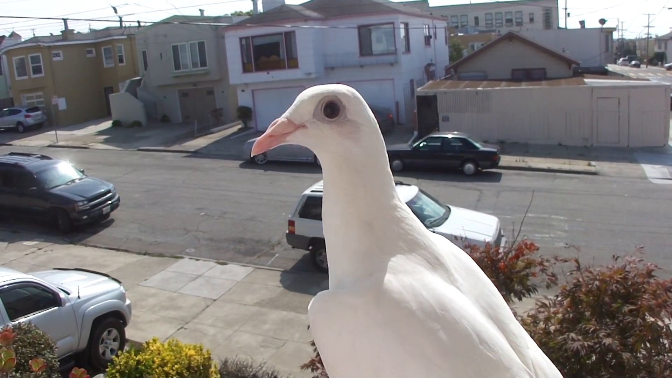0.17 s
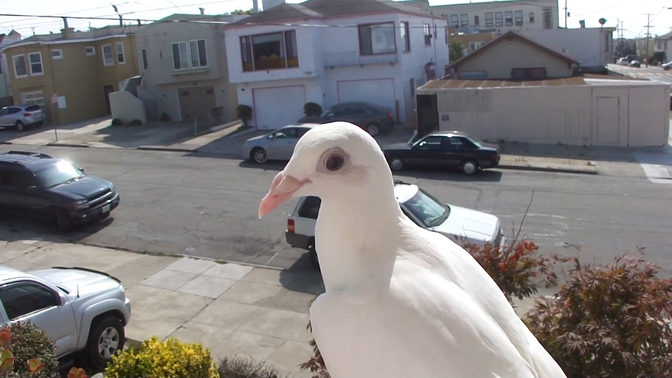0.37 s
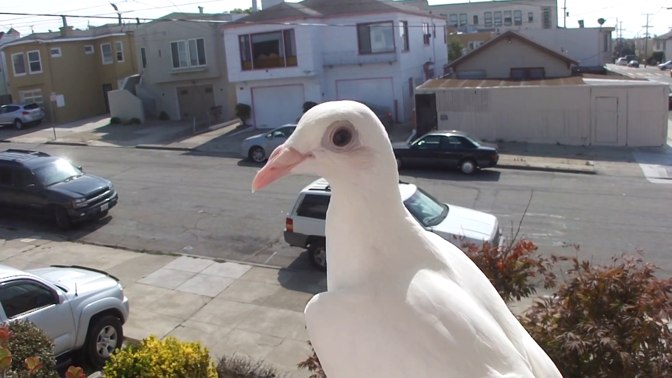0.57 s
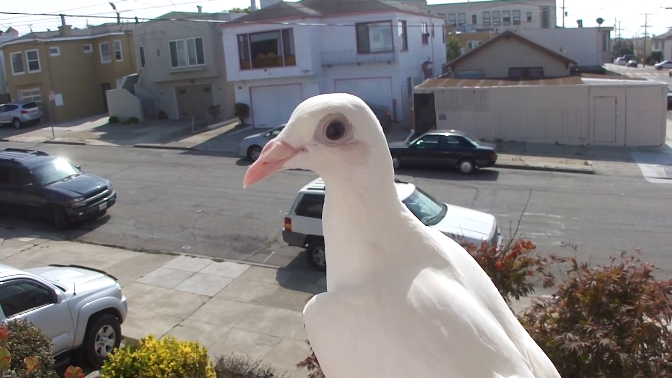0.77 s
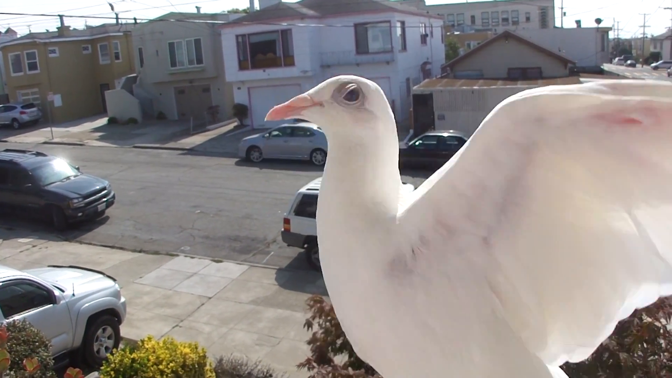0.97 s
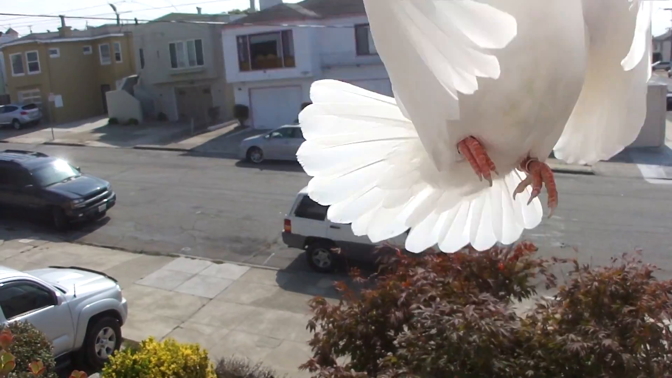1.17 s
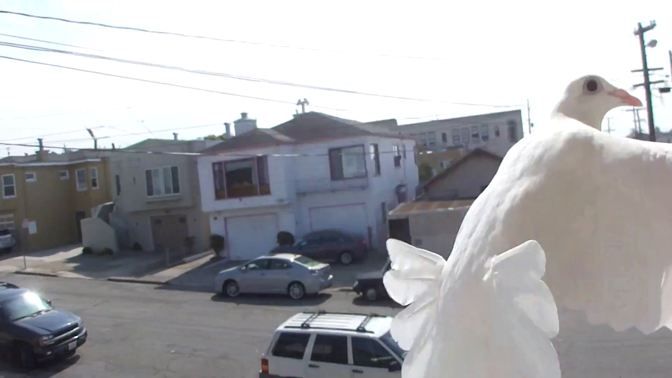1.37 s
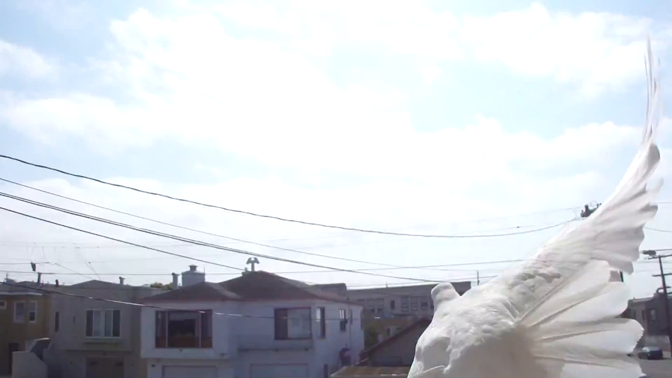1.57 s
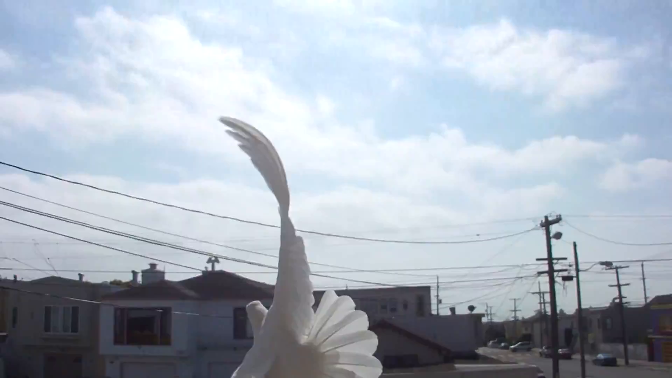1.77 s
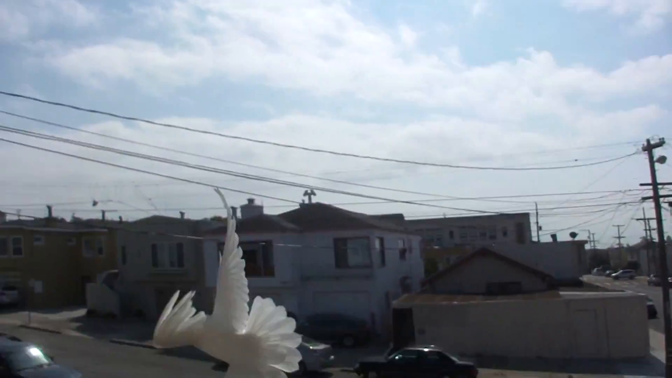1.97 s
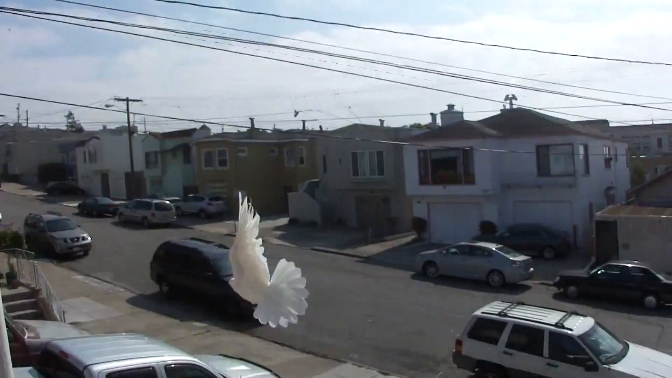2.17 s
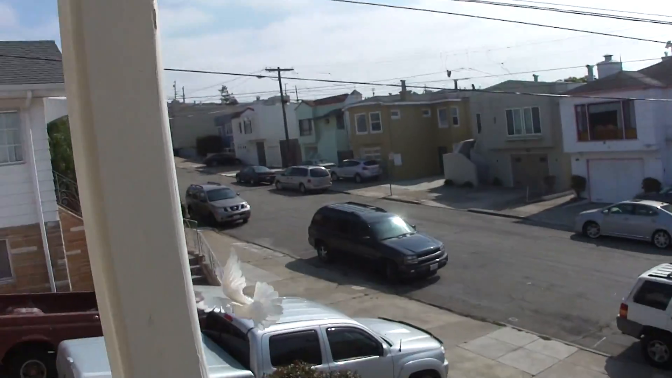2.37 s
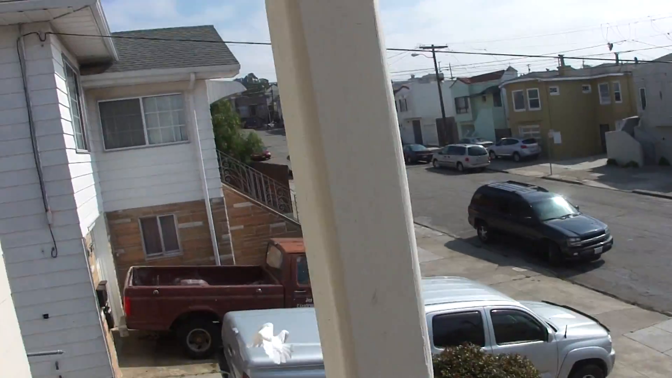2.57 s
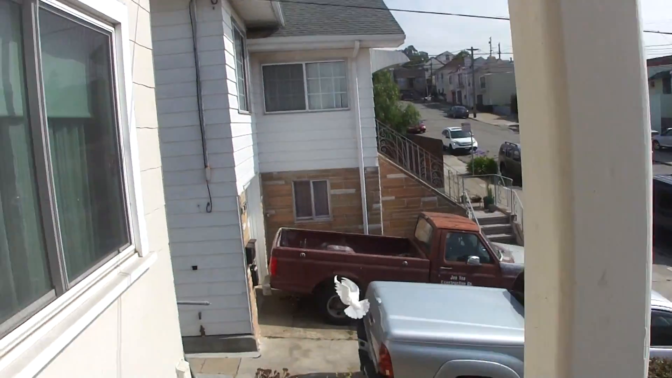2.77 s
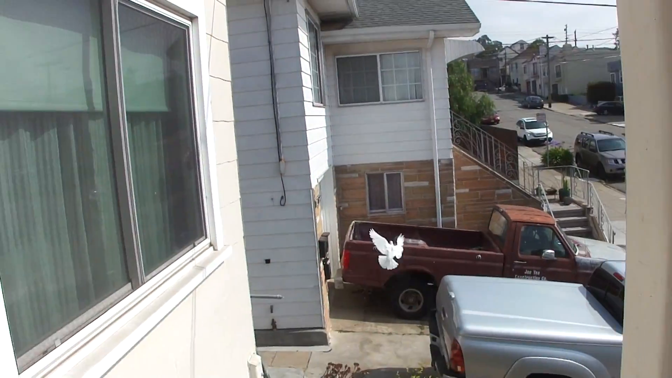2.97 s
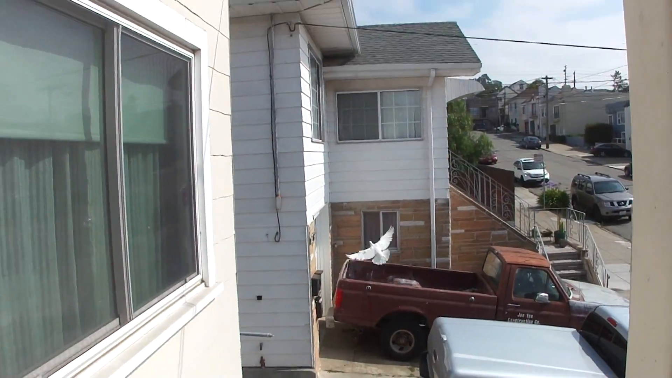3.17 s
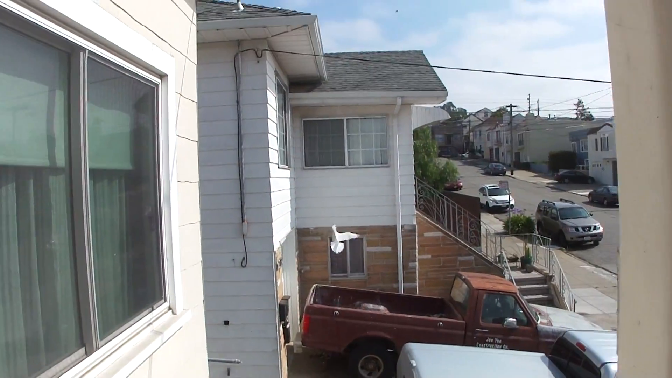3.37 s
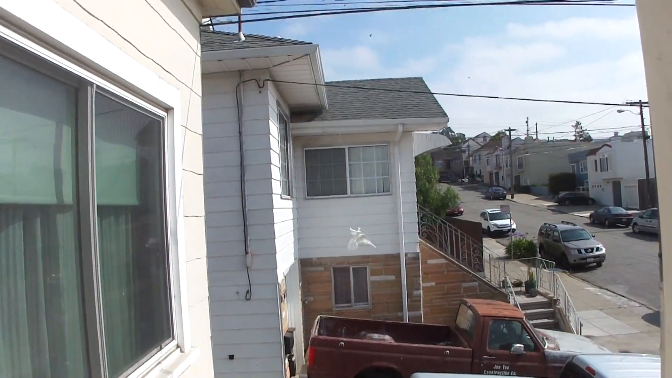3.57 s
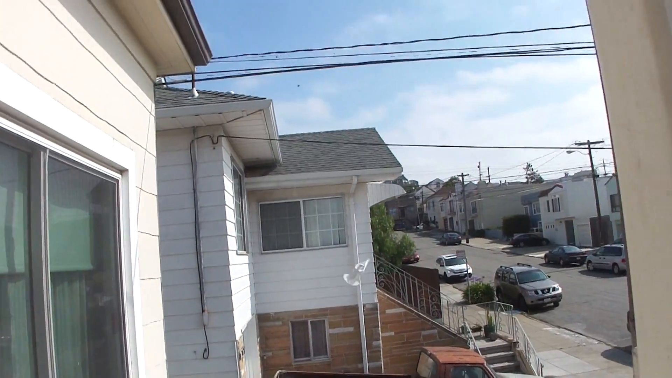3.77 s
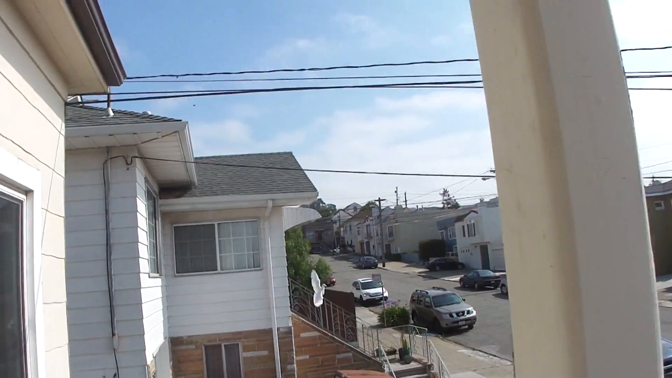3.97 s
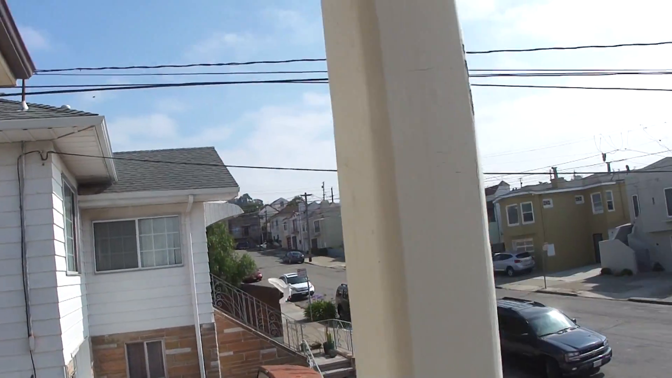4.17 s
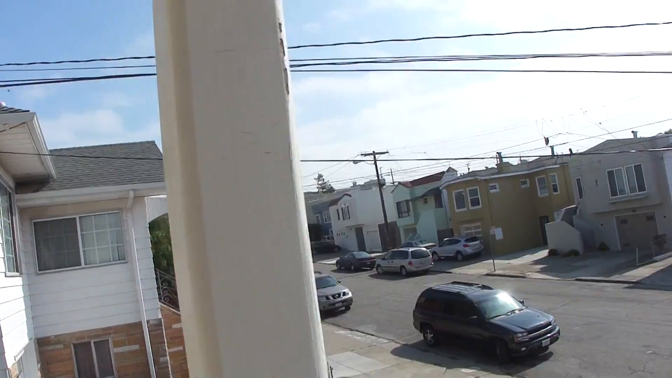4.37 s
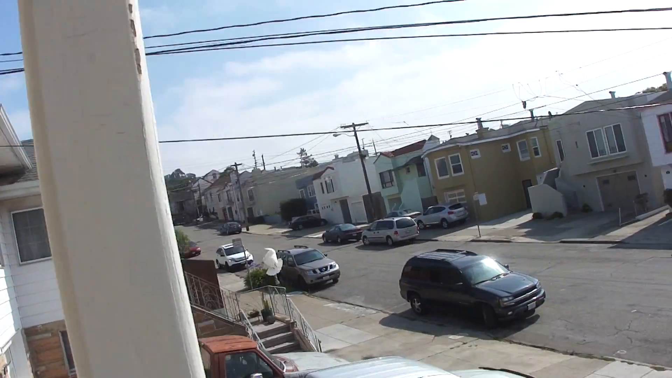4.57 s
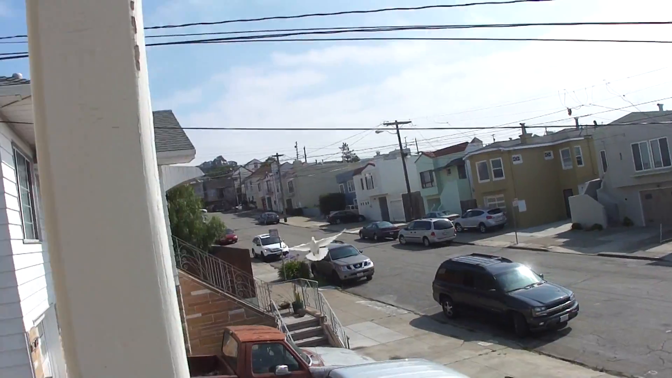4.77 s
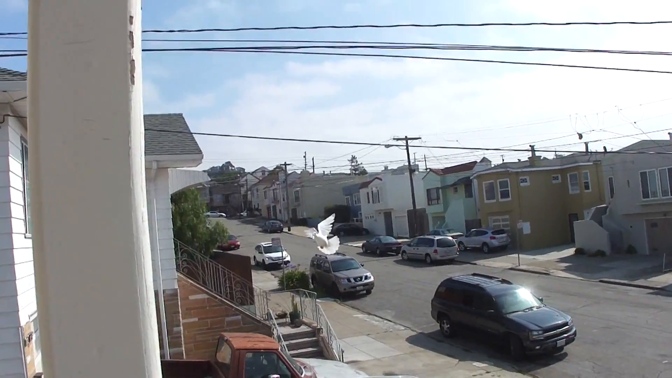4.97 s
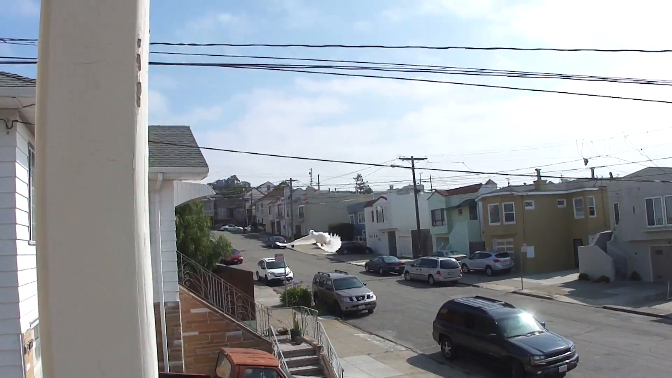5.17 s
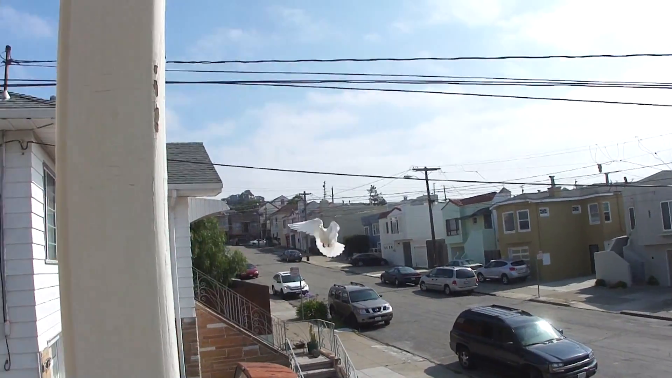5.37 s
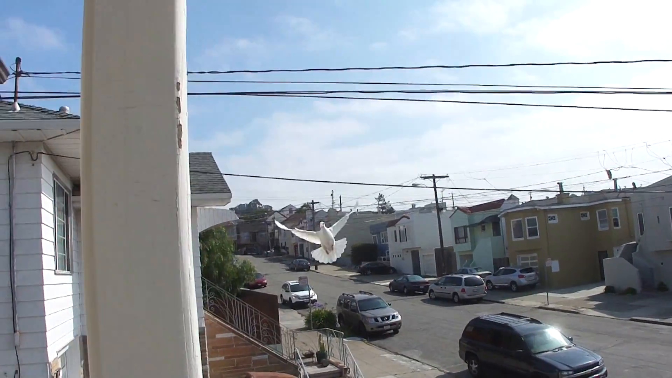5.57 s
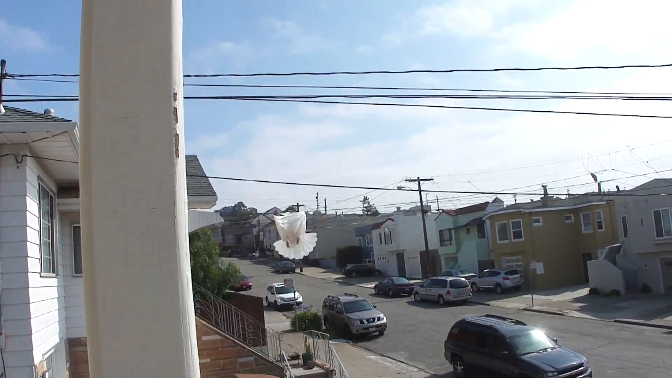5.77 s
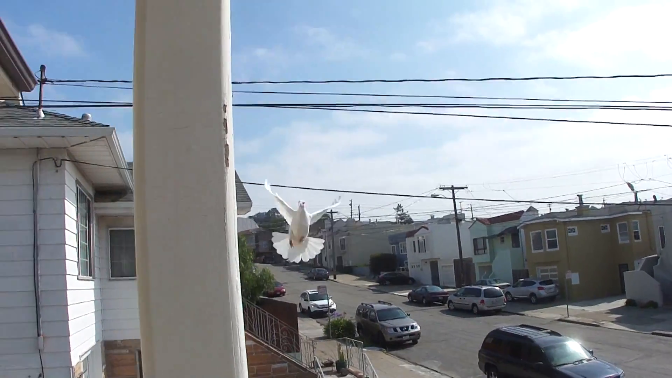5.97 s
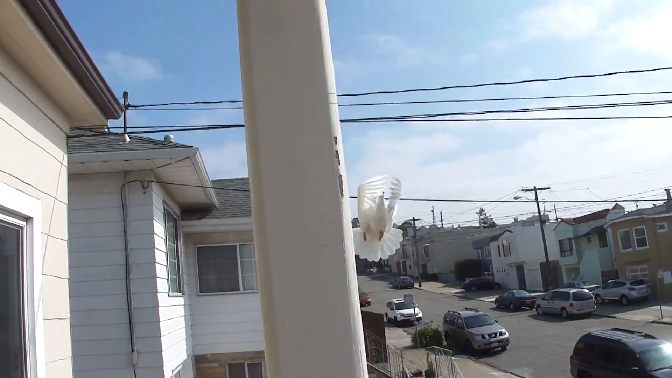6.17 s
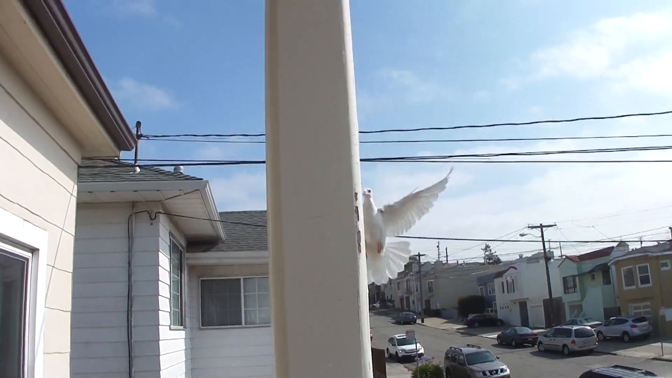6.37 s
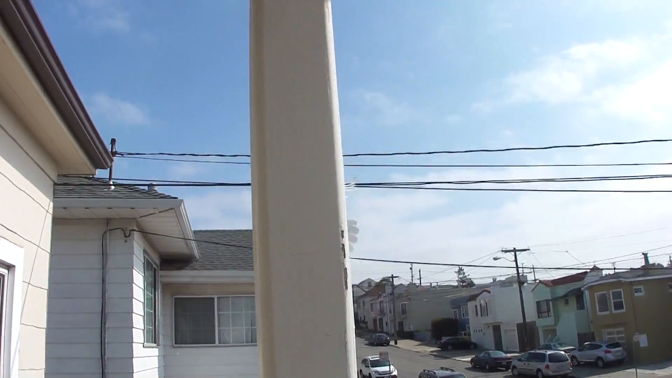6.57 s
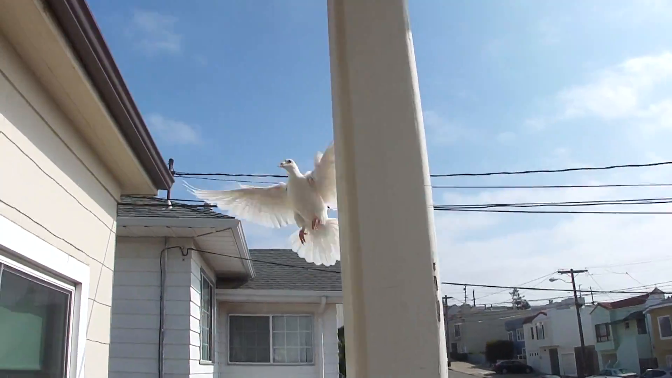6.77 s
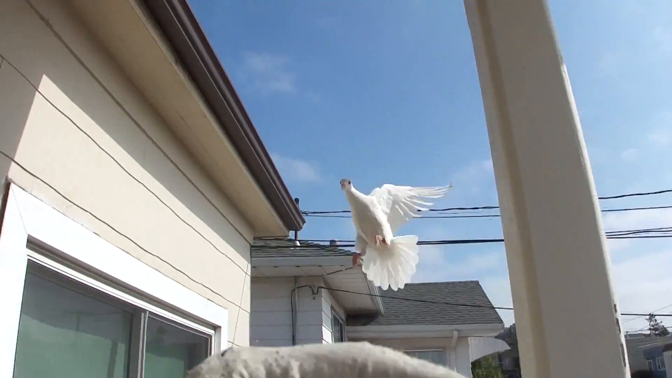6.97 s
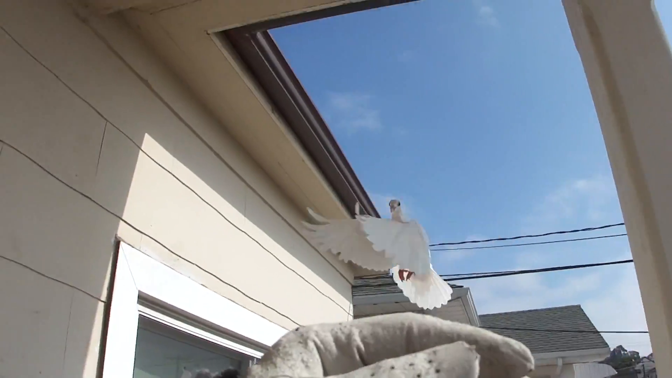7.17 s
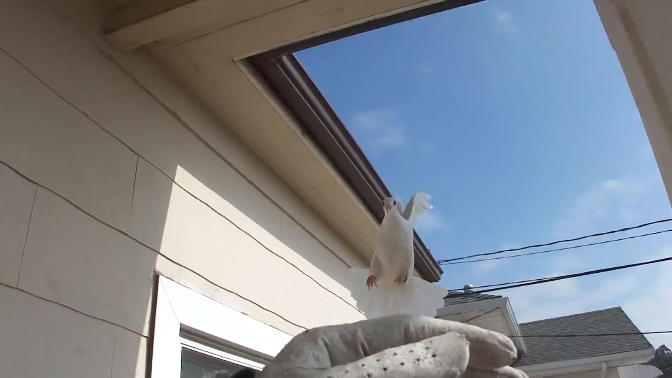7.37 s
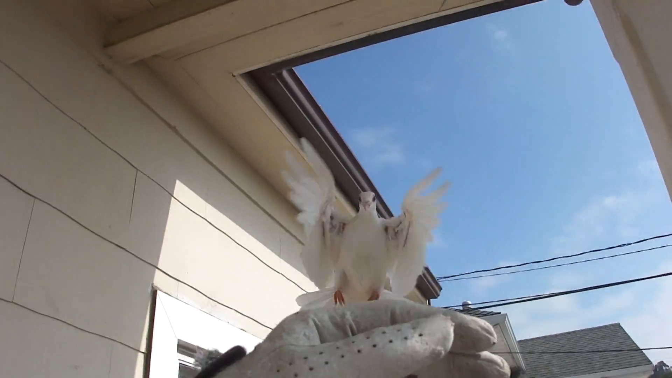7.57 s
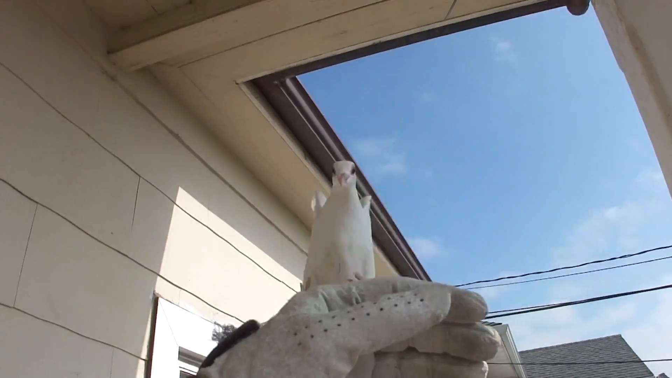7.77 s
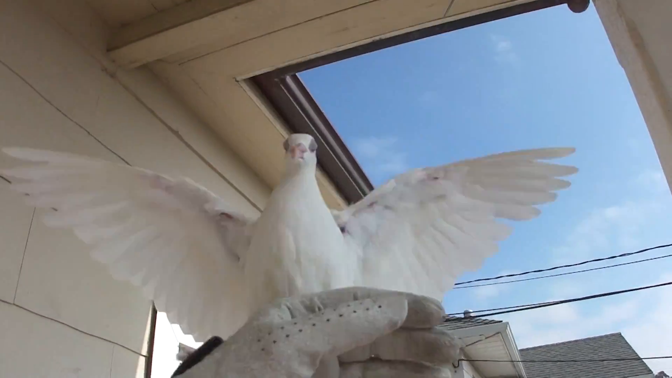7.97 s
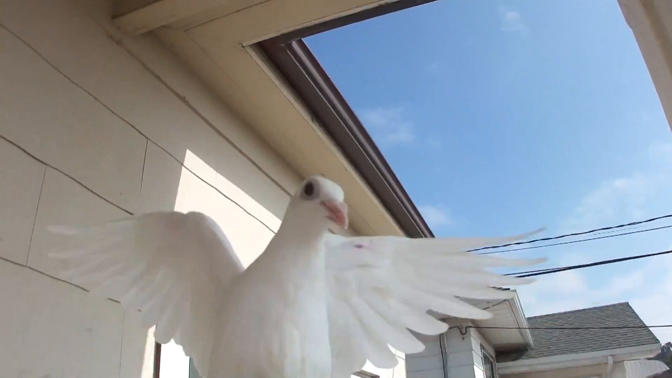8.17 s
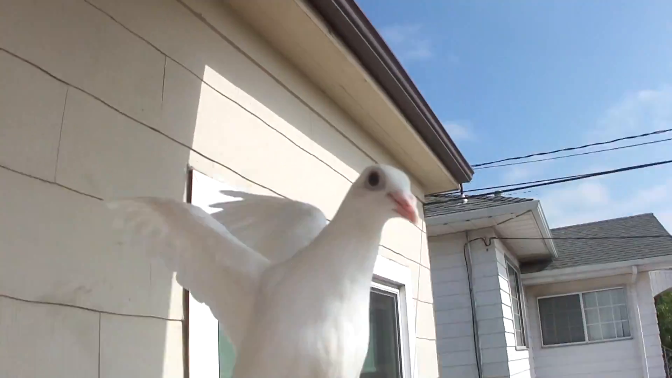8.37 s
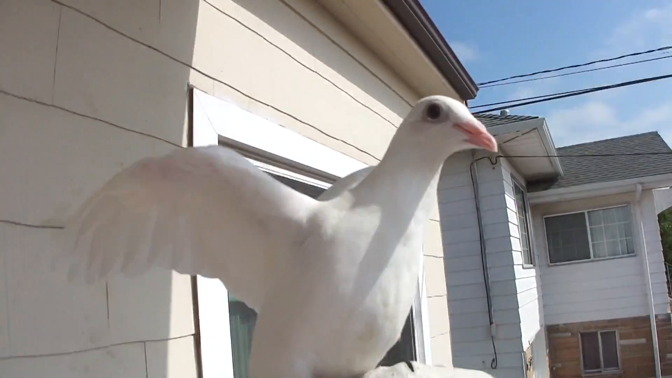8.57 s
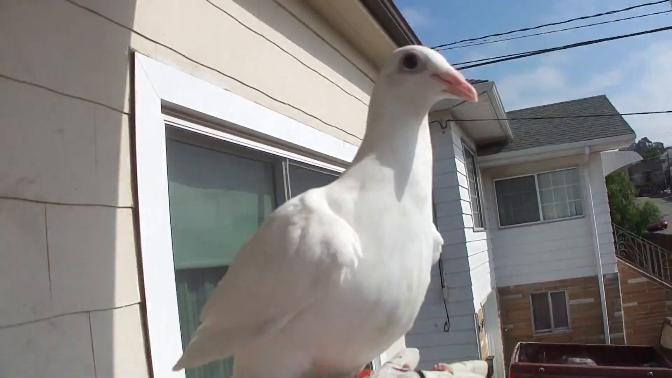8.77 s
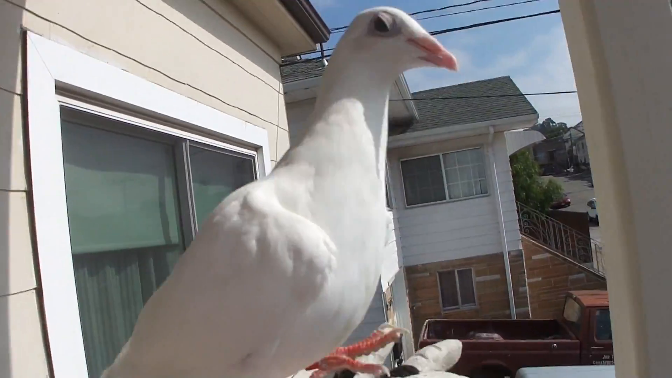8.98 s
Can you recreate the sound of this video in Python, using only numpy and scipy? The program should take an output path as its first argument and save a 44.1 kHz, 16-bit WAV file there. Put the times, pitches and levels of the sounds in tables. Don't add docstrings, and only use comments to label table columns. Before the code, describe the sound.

A faint street hum with a brief thin far squeal opens the scene. A bird's wings suddenly slap hard beside the microphone, pushing thumps of air into it, spread wide in stereo. Flapping shrinks to soft puffs in the distance while a far car swells slightly. Fast, breathy wingbeats then approach, louder and drier, ending in soft folding rustles by the house wall.

```python
import sys
import numpy as np
from scipy import signal
from scipy.fft import rfft, irfft, next_fast_len
from scipy.io import wavfile

SR = 44100
rng = np.random.default_rng(int(sys.argv[2]) if len(sys.argv) > 2 else 0)


def attenuation_scalar(level_db):
    decades = np.asarray(level_db, float) / 20
    return 10 ** decades


def store_wav(level_fs):
    pcm = np.round(np.clip(np.atleast_2d(level_fs), -1, 1) * 32767)
    wavfile.write(sys.argv[1], SR, pcm.T.astype(np.int16))


N = 398663

BIRD_PAN_DB = -1.5
# f/Hz, density/dB
RUSTLE = [(1500, -44), (3000, -1), (6000, 2.5), (10000, 5.5), (16000, -3.5)]
# f/Hz, likeness/-1..1
WING_ALIKE = [(100, 1), (1000, 0.965), (3000, 0.94), (8000, 0.66), (15000, 0.067)]


def in_time(rows):
    s, *columns = np.transpose(rows)
    return [np.interp(np.arange(N) / SR, s, c) for c in columns]


def at_hz(points, hz):
    point_hz, value = np.transpose(points)
    return np.interp(np.log(hz + 1), np.log(point_hz), value)


def drift(rate_hz):
    r = np.exp(-80 * np.pi * rate_hz / SR)
    slow = signal.lfilter([1], [1, -2 * r, r * r], rng.standard_normal(N // 40 + 2002))[2000:]
    slow = slow / np.sqrt(np.mean(slow ** 2) + 1e-20)
    return np.interp(np.arange(N) / 40, np.arange(len(slow)), slow)


def noise(spectrum, alike):
    size = next_fast_len(N)
    hz = np.arange(size // 2 + 1) * SR / size
    mid, side = rfft(rng.standard_normal((2, size))) * attenuation_scalar(at_hz(spectrum, hz))
    share = np.clip(at_hz(alike, hz), -.99, .99)
    pair = np.array([mid * np.sqrt(1 + share), side * np.sqrt(1 - share)])
    mid, side = irfft(pair, size)[:, :N]
    return np.array([mid + side, mid - side]) / np.std(mid)


def sides(pan_db):
    return attenuation_scalar([[pan_db / 2], [-pan_db / 2]])


def swells(rows):
    t = np.arange(0, N + 32, 32) / SR
    bells = sum(attenuation_scalar(level_db) * np.exp(-((t - s) / width_s) ** 2) for s, level_db, width_s in rows)
    return np.interp(np.arange(N) / SR, t, bells)


def decay(t60_s, rise_s):
    t = np.arange(SR // 5) / SR
    return np.minimum(t / rise_s, 1) * attenuation_scalar(-60 * t / t60_s)


def snaps():
    # t/s, bright peak/dB, body re bright/dB, tail/dB
    take_off = [(1.0526, -31.5, 10, 0), (1.0805, -2, -.5, -37), (1.0925, -26, 8, -25),
                (1.141, -29.5, 14.5, -8), (1.1726, -26, 13, -9), (1.217, -22, -3, -5), (1.245, -29, 0, -20),
                (1.2714, -32, 2, -14), (1.2945, -16, 12.5, -16), (1.3225, -24, 11, -26),
                (1.3467, -16, 8, -24), (1.3754, -26, 8, -6), (1.4093, -8, 4.5, -17), (1.4605, -8, 4, -16),
                (1.5142, -10, 8, -16), (1.5692, -26, 0, -14), (1.5974, -15, 7.5, -6.5),
                (1.6467, -24, -15, -13), (1.698, -22, -6, -5), (1.7244, -23, 0, -22),
                (1.7455, -15.5, 8, -13), (1.812, -23, 4, -10), (1.858, -23, 4, -16), (1.9106, -28, 15, -9),
                (1.957, -22.5, 4, -5), (1.992, -26, 2, -22), (2.0229, -28, 5, -7),
                (2.1464, -26.5, 10, -6.5), (2.212, -27.5, 6, -4), (2.2394, -34, -6, -1),
                (2.291, -33, 5, -3)]
    # t/s, bright peak/dB, tail/dB
    circling = [(2.3926, -38, -2), (2.621, -35, -1), (2.8986, -32.5, -11), (3.934, -40, -6),
                (3.9944, -42, -5), (4.0483, -39, -5), (4.1037, -39, -6), (4.1575, -38, -11),
                (4.215, -29.5, -8), (4.271, -41, -13), (4.331, -35, -2), (4.5556, -33, -7),
                (4.603, -33, -8), (4.778, -35, -3), (4.9986, -38, -19)]
    # t/s, bright peak/dB, tail/dB
    homeward = [(5.9345, -42, -6), (6.0474, -36.5, -11), (6.116, -37, -12), (6.3064, -35, -5),
                (6.366, -33.5, -8), (6.431, -26, -12), (6.493, -31, -2.5), (6.55, -28.5, -9),
                (6.614, -33.5, -1), (6.6763, -29.5, -6.5), (6.817, -42, -6), (6.8778, -28, -2),
                (6.944, -27, -8), (7.0115, -29.5, 0), (7.0745, -25, -6), (7.1373, -21.5, -11),
                (7.202, -24, -8.4), (7.2685, -34, 0), (7.3378, -32, -3), (7.4, -35, -3), (7.466, -36, -4),
                (7.534, -32, -10), (7.6706, -32, -9), (7.7325, -40, -2), (7.799, -32, -4),
                (7.8626, -35, -10), (7.915, -36, 2)]
    # t/s, bright peak/dB, tail/dB
    folding = [(8.0038, -42, -8), (8.0517, -46, 6), (8.075, -43, 3), (8.11, -35, -4), (8.2128, -46, 0),
               (8.232, -44, 3), (8.308, -42, 0), (8.365, -42, 0), (8.438, -36, -7), (8.5012, -43, -6),
               (8.7715, -35, -14)]
    # t/s, level/dB
    tick = (.506, -51)
    # f/Hz, density/dB
    clap_body = [(150, -36), (500, 0), (1200, 7), (2200, 10.5), (4500, 3), (8000, -58)]
    crack_t60_s, crack_dry_s_per_db = .016, .0003
    tilt_db, split_hz = 3, 8000

    rows = list(take_off)
    for table, body_db in [(circling, -3), (homeward, 5), (folding, 4)]:
        rows += [(s, db, body_db, tail_db) for s, db, tail_db in table]
    rows += [(*tick, -20, -20)]
    bright, sharp, body, clicks = np.zeros((4, N + SR))
    for (s, peak_db, body_db, tail_db), lean in zip(rows, rng.uniform(-1, 1, len(rows))):
        start = round(s * SR)
        span = slice(start, start + SR // 5)
        t60_s = np.clip(crack_t60_s - crack_dry_s_per_db * tail_db, .006, .2)
        rise_s = .0002 + .012 * attenuation_scalar(1.5 * tail_db)
        crack = decay(t60_s, rise_s)
        tail = attenuation_scalar(tail_db) * decay(.11, .0069)
        bright[span] += attenuation_scalar(peak_db - tilt_db * lean) * (crack + tail)
        sharp[span] += attenuation_scalar(peak_db + tilt_db * lean) * (crack + tail)
        body[span] += attenuation_scalar(peak_db + body_db) * (crack + .5 * tail)
        clicks[start + 20] -= attenuation_scalar(peak_db + body_db - .76 * tail_db - 23.5)
    click_band = signal.butter(1, [700, 2600], "band", fs=SR, output="sos")
    pop = attenuation_scalar(10) * signal.sosfilt(click_band, clicks[:N])
    hiss = noise(RUSTLE, WING_ALIKE)
    low = signal.sosfilt(signal.butter(2, split_hz, fs=SR, output="sos"), hiss)
    bright = attenuation_scalar(.5) * (bright[:N] * low + sharp[:N] * (hiss - low))
    body = attenuation_scalar(-3.5) * body[:N] * noise(clap_body, WING_ALIKE)
    return sides(BIRD_PAN_DB) * (attenuation_scalar(2.8 * drift(250)) * (bright + body) + pop)


def strokes():
    # peak t/s, peak/dB, whistle f/Hz, whistle share/0..1
    away = [(1.231, -10.5, 880.0, 0.55), (1.3225, -17, 986, 0.6), (1.602, -20, 900.0, 0.1),
            (1.755, -22, 1000, 0.7), (2.244, -21.5, 386.7, 0.22), (2.313, -30, 890, 0.7),
            (2.413, -34.0, 923, 0.5), (2.756, -31, 850, 0.4), (2.835, -31.5, 910, 0.1),
            (2.955, -29, 700, .4), (3.288, -36.5, 820.0, 0.65), (3.98, -39, 900, 0.8),
            (4.724, -41, 726, 0.4), (5.002, -37.5, 757, 0.8), (5.08, -42, 900, .5), (5.197, -37, 800, .7),
            (5.3, -41, 900, .5)]
    # peak t/s, peak/dB, whistle f/Hz, whistle share/0..1
    home = [(5.42, -39, 830, .7), (5.55, -41, 970.0, 0.7), (5.695, -36.5, 723, 0.4),
            (5.845, -37.5, 712, 0.6), (5.98, -36, 701, 0.24), (6.099, -35.5, 830.0, 0.3),
            (6.236, -31.5, 740.0, 0.8), (6.36, -33, 850, 0.4), (6.483, -28.5, 850.0, 0.63),
            (6.64, -32.5, 420, 0.5), (6.722, -31, 710.0, 0.5), (6.868, -29.5, 780.0, 0.45),
            (7.0, -26.5, 900, 0.25), (7.125, -25.5, 720, 0.15), (7.256, -30, 700.0, 0.36),
            (7.388, -25.5, 960, 0.3), (7.52, -28.5, 740, 0.55), (7.653, -25, 750, 0.5),
            (7.78, -21, 860, 0.35), (7.904, -23.5, 750.0, 0.4)]
    # f/Hz, density/dB
    whoosh_colour = [(100, -30), (300, -3), (700, 3), (1500, -1.5), (2500, -2), (4000, -11.5), (8000, -27)]
    away_width_s, home_width_s, width_s_per_db = .025, .037, -.0007
    away_fall, home_fall = .4, .75

    rows = [(*row, away_width_s, away_fall) for row in away]
    rows += [(*row, home_width_s, home_fall) for row in home]
    swell, whistle = np.zeros((2, N))
    half = SR // 8
    t = np.arange(-half, half) / SR
    wobble = drift(110)
    flutter = attenuation_scalar(4.5 * np.clip(drift(60), -3, .8))
    for s, peak_db, hz, share, width_s, fall in rows:
        span = slice(round(s * SR) - half, round(s * SR) + half)
        width_s = np.clip(width_s + width_s_per_db * (peak_db + 30), .005, .08)
        share = np.clip(share, 0, .8)
        speed = np.exp(-np.abs(t / (width_s * np.where(t < 0, .95, fall))) ** 1.9)
        pitch_hz = hz * (.74 + .28 * speed) * (1 + .07 * wobble[span])
        phase = 2 * np.pi * np.cumsum(pitch_hz) / SR
        octave = attenuation_scalar(-6 + .3 * min(peak_db + 25, 0)) * np.sin(2 * phase + 1)
        swell[span] += attenuation_scalar(peak_db - 7.5) * np.sqrt(1 - share) * speed ** .87
        whistle[span] += attenuation_scalar(peak_db - 1.5) * np.sqrt(share) * speed ** 1.3 * (np.sin(phase) + octave)
    whoosh = noise(whoosh_colour, WING_ALIKE) + attenuation_scalar(-13) * noise(RUSTLE, WING_ALIKE)
    return sides(BIRD_PAN_DB) * (swell * whoosh + whistle * flutter)


def knocks():
    # t/s, peak/dB, ring f/Hz, t60/s
    dull = [(1.079, -13, 750, 0.056), (1.083, -12, 290, 0.04), (1.32, -11, 972, 0.023),
            (1.348, -15, 400, .02), (1.384, -16.5, 450, 0.05), (1.482, -13.5, 430, 0.11),
            (1.427, -17, 880, .15), (1.529, -14, 850, 0.11), (1.594, -16, 450, 0.1),
            (1.619, -15, 424, 0.015), (1.699, -22, 400, 0.08), (1.725, -14, 1800, 0.015),
            (1.812, -17, 400, 0.1), (1.912, -16.5, 440, 0.09), (1.957, -17.5, 1700, 0.05),
            (1.991, -24, 1090, 0.045), (2.026, -16, 520, 0.1), (2.29, -23, 820, 0.04),
            (2.619, -20, 420, 0.17), (2.62, -23, 1200, 0.18), (2.945, -31, 350, 0.1),
            (6.55, -25.5, 1000, 0.06), (7.076, -23, 1200, 0.14), (7.202, -25, 1400, .05),
            (7.252, -21, 807, 0.04), (7.862, -26, 676, 0.04), (7.91, -28, 330, .1)]
    # t/s, peak/dB, ring f/Hz
    home_puffs = [(6.205, -31, 750), (6.228, -24.5, 740), (6.362, -31, 450), (6.465, -32, 450),
                  (6.49, -29, 950), (6.515, -31, 430), (6.55, -31, 430), (6.612, -29, 1900),
                  (6.615, -30, 430), (6.645, -32, 430), (6.678, -28, 1800), (6.812, -33, 1500),
                  (6.878, -29, 420), (6.88, -29, 1500), (6.99, -26, 900), (7.005, -30, 430),
                  (7.02, -28, 2000), (7.138, -25, 1100), (7.165, -29, 500), (7.338, -29, 650),
                  (7.352, -29, 1700), (7.488, -26, 700), (7.505, -25, 1550), (7.53, -27, 720),
                  (7.63, -30, 2300), (7.637, -24.5, 1600), (7.66, -30, 2400), (7.752, -27, 1700),
                  (7.77, -28, 2300), (7.878, -26, 720), (7.915, -28, 2100), (7.935, -30, 650),
                  (7.235, -34, 430), (7.645, -30, 450), (7.755, -26, 450), (7.8, -31, 450),
                  (6.52, -31, 1700), (7.6, -32, 1600), (7.97, -35, 600)]
    # t/s, peak/dB, ring f/Hz
    away_puffs = [(1.192, -21, 1000), (1.196, -25, 1900), (1.21, -18, 380), (1.268, -19, 300),
                  (1.368, -21, 1800), (1.408, -16, 400), (1.432, -23, 380), (1.456, -19, 350),
                  (1.508, -21, 400), (1.51, -13, 1000), (1.532, -17, 1800), (1.552, -21, 1700),
                  (1.548, -22, 400), (1.632, -22, 420), (1.652, -23, 420), (1.652, -23, 1800),
                  (1.69, -21, 750), (1.778, -22, 1000), (1.788, -21, 1800), (1.812, -20, 950),
                  (1.865, -21, 950), (1.912, -20, 1850), (1.932, -21, 430), (1.952, -21, 430),
                  (1.953, -23, 950), (2.02, -23, 950), (2.06, -25, 1750), (2.168, -25, 1000),
                  (2.176, -28, 1700), (2.185, -26, 700), (2.208, -24, 1000), (2.238, -24, 950),
                  (2.288, -28, 400), (2.308, -24, 900), (2.75, -33, 1900), (2.825, -32, 2000),
                  (3.0, -32, 750), (3.06, -34, 900), (3.17, -35, 900), (3.27, -37, 1800)]
    # t/s, peak/dB, ring f/Hz
    far_puffs = [(3.935, -33, 832), (3.976, -31, 1010), (4.048, -32, 579), (4.077, -28, 907),
                 (4.158, -30, 1220), (4.216, -30, 1180), (4.245, -29, 398), (4.273, -29, 681),
                 (4.334, -31, 807), (4.388, -29, 724), (4.445, -27, 829), (4.554, -26, 818),
                 (4.605, -25, 686), (4.67, -28, 732), (4.72, -27, 732), (4.764, -30, 560),
                 (4.802, -32, 581), (4.859, -33, 444), (4.923, -31, 716)]
    pan_db, knock_rise_s = -2.2, .00074
    puff_t60_s, puff_rise_s = .06, .005
    far_db, far_lead_s, tip_hz, tip_db = -6, .005, 1900, -5

    far = [(s - far_lead_s, db + far_db, hz) for s, db, hz in far_puffs]
    far += [(s, db + tip_db, tip_hz) for s, db, hz in far]
    rows = [(*row, knock_rise_s) for row in dull]
    rows += [(*row, puff_t60_s, puff_rise_s) for row in [*home_puffs, *away_puffs, *far]]
    shakes = rng.standard_normal((len(rows), 2, SR // 5))
    out = np.zeros((2, N))
    for (s, peak_db, hz, t60_s, rise_s), shake in zip(rows, shakes):
        start = round(s * SR)
        band = signal.butter(2, [.76 * hz, 1.35 * hz], "band", fs=SR, output="sos")
        mid, side = signal.sosfilt(band, shake * decay(np.clip(t60_s, .01, .2), rise_s))
        pair = np.array([mid + .2 * side, mid - .22 * side]) / np.abs(mid).max()
        out[:, start:start + SR // 5] += attenuation_scalar(peak_db) * sides(pan_db) * pair
    return out


def pushes():
    # t/s, peak/dB, f/Hz
    slugs = [(1.154, -22, 170), (1.23, -20, 100), (1.32, -12, 140), (1.347, -20, 240), (1.385, -25, 90),
             (1.424, -23, 100), (1.462, -21, 240), (1.514, -24, 150), (1.574, -28, 140), (1.614, -21, 150),
             (1.722, -26, 150)]
    length_cycles = 2.5
    out, t = np.zeros((2, N)), np.arange(SR // 5) / SR
    for s, peak_db, hz in slugs:
        start = round(s * SR)
        swing = np.sin(2 * np.pi * hz * t + np.array([[.9], [-.9]]))
        swing = swing * decay(length_cycles * 2 / hz, .6 / hz)
        out[:, start:start + SR // 5] += attenuation_scalar(peak_db + 4.5) * swing
    return out


def wing_air():
    # t/s, rush/dB, ruffle re rush/dB
    air = [(1.07, -34.5, -10), (1.47, -24.5, -17.5), (2.09, -30, -16), (2.4, -40, -17), (2.89, -36, -17.5),
           (3.25, -42.5, -17), (3.9, -45, -18), (4.15, -39.5, -17.5), (4.7, -38.5, -16.5),
           (5.1, -43.5, -25), (6.09, -43.5, -15.5), (6.7, -39.5, -16.5), (7.09, -35, -19.5),
           (7.79, -38.5, -16.5), (8.05, -42.5, -17), (8.39, -44, -16.5), (8.5, -48.5, -16),
           (9.04, -47, -22)]
    # t/s, change/dB, width/s
    lulls = [
        (1.12, -3, .02),
        (1.255, -3, .01),
        (1.336, -9, .009),
        (1.68, -3, .01),
        (2.12, -6, .022),
    ]
    # f/Hz, density/dB
    rush_colour = [(60, -65), (150, -11.5), (400, 4), (900, 4), (1800, -2), (2600, -5), (4500, -15.5),
                   (8000, -46)]
    post_s, post_width_s, post_rush_db, post_rustle_db = 6.785, .04, -7, -3

    rush_db, ruffle_db = in_time(air)
    hidden = swells([(post_s, 0, post_width_s)])
    slack_db = -swells([(s, 20 * np.log10(-db), width_s) for s, db, width_s in lulls])
    rustle_db = rush_db + ruffle_db + post_rustle_db * hidden + slack_db
    rush_db = rush_db + post_rush_db * hidden + slack_db
    rush = attenuation_scalar(rush_db - 3.3 + 1.6 * drift(30)) * noise(rush_colour, WING_ALIKE)
    rustle = attenuation_scalar(rustle_db + 5.5 + 2.2 * drift(26) + 2.5 * drift(300)) * noise(RUSTLE, WING_ALIKE)
    flying = np.clip((np.arange(N) / SR - .975) / .07, 0, 1)
    return flying * sides(BIRD_PAN_DB) * (rush + rustle)


def gusts():
    # t/s, level/dB, width/s
    puffs = [(1.1, -46, 0.034), (1.158, -27.5, 0.023), (1.24, -27.5, 0.017), (1.272, -26, 0.017),
             (1.326, -21.5, 0.011), (1.365, -30, 0.015), (1.398, -22.5, .012), (1.45, -31, 0.023),
             (1.62, -34, 0.014), (1.72, -34.5, 0.038), (1.85, -45, 0.064), (2.03, -45, 0.053),
             (2.2, -43, 0.061)]
    # f/Hz, density/dB
    gust_colour = [(30, -55), (70, -8), (150, 3), (300, 5), (600, -4), (1500, -47.5)]
    # t/s, level/dB, width/s
    thumps = [
        (.57, -56, 0.021),
        (2.45, -49, 0.032),
        (4.6, -53, 0.066),
        (4.98, -47.5, 0.053),
        (7.78, -55, .04),
        (7.92, -56, .03),
    ]
    # f/Hz, density/dB
    thump_colour = [(25, -33), (50, -20), (90, -3), (160, -4.5), (300, -31)]
    lumps = swells(puffs) * attenuation_scalar(-3 + 2.7 * np.array([drift(25), drift(29)]))
    buffeting = lumps * noise(gust_colour, [(50, .28), (500, .093)])
    return buffeting + swells(thumps) * noise(thump_colour, WING_ALIKE)


def walls(x):
    # delay/s, level/dB
    echoes = [
        (.011, -16),
        (.023, -22),
        (.037, -26),
        (.067, -28),
    ]
    dull, out = signal.lfilter([.4], [1, -.6], x), np.zeros_like(x)
    for k, (s, level_db) in enumerate(echoes):
        lag = round(s * SR)
        out[:, lag:] += attenuation_scalar(level_db) * dull[::(-1) ** k, :-lag]
    return out


def street():
    # f/Hz, density/dB
    hum_colour = [(100, -38), (200, -5.5), (300, -0.5), (450, -1), (750, -3), (1150, -5.5), (2000, -10),
                  (4000, -17.5), (7000, -23), (16000, -27.5)]
    # f/Hz, likeness/-1..1
    alike = [(60, -0.47), (180, 0.91), (550, 0.54), (1650, 0.3), (4970, -0.38), (15000, 0.11)]
    # t/s, deep/dB, engine drone/dB
    rumble = [
        (0.0, -78, -62),
        (0.95, -69, -60),
        (1.28, -70, -44),
        (2.82, -78, -67),
        (3.95, -90, -63),
        (4.45, -73.5, -58.5),
        (9.04, -74, -55.5),
    ]
    # f/Hz, density/dB
    deep_colour = [(25, -36.5), (50, -8.5), (75, -2.5), (110, -18.5), (200, -46.5)]
    # f/Hz, density/dB
    drone_colour = [(50, -45), (90, -16.5), (130, 2), (190, -1), (300, -26)]
    # f/Hz, density/dB
    tyre_colour = [(700, -33.5), (1020, -8), (1180, 0), (1350, -9), (1900, -30)]
    # start/s, end/s, f/Hz, level/dB, wobble/Hz
    tones = [
        (.14, .36, 3450, -62, 90),
        (.18, .43, 6610, -65.5, 45),
        (.18, .43, 13200, -60, 60),
        (0, 9.04, 7866, -70.5, 14),
    ]
    # f/Hz, density/dB
    passing_colour = [(500, -30), (750, -3), (900, 0), (1050, -4), (1500, -30)]
    # t/s, level/dB, width/s
    passing_car = [
        (5.0, -44, .12),
        (5.35, -45, .3),
    ]
    hum_db, tyres_db, tyres_end_s = -47, -52, 1.7

    t = np.arange(N) / SR
    deep_db, drone_db = in_time(rumble)
    out = attenuation_scalar(hum_db - .5 + .77 * drift(1.9)) * noise(hum_colour, alike)
    out += attenuation_scalar(deep_db) * noise(deep_colour, alike)
    out += attenuation_scalar(drone_db) * noise(drone_colour, alike)
    out += attenuation_scalar(tyres_db) * np.clip((tyres_end_s - t) / .85, 0, 1) * noise(tyre_colour, alike)
    for start, end, hz, level_db, wobble_hz in tones:
        fade = np.clip(np.minimum(t - start, end - t) / .036, 0, 1)
        phase = 2 * np.pi * np.cumsum(hz + wobble_hz * drift(60)) / SR
        out += attenuation_scalar(level_db + 2 * drift(25)) * fade * np.sin(phase)
    out += swells(passing_car) * noise(passing_colour, alike)
    return sides(-1.7) * out


def scene():
    # t/s, side gain/dB
    spread = [
        (1.0, 11),
        (1.1, 17),
        (1.3, 4.5),
        (1.6, 3),
        (2.3, 6),
        (3, 7.5),
        (9.04, 2),
    ]
    beats = snaps() + strokes() + knocks()
    left, right = beats + walls(beats) + wing_air()
    low_pass = signal.butter(2, 7000, fs=SR, output="sos")
    side = signal.sosfilt(low_pass, left - right * attenuation_scalar(BIRD_PAN_DB)) / 2
    extra_side = (attenuation_scalar(in_time(spread)[0]) - 1) * side
    return np.array([left + extra_side, right - extra_side]) + gusts() + pushes() + street()


def roll_off(x):
    return signal.sosfilt(signal.butter(12, 16370, fs=SR, output="sos"), x)


def record(dry):
    # f/Hz, gain/dB
    mic = [(2000, 0.5), (2700, -12), (3500, -18), (4500, -17.5), (5600, -5.5), (6400, -1.5), (10300, -9.5),
           (11800, -23.5), (12800, -33), (14600, -12), (15700, -5)]
    # f/Hz, width/Hz, gain/dB
    notches = [(3003, 200, -12), (4002, 140, -15), (5010, 190, -15), (12000, 290, -14), (14000, 300, -16)]
    low_cut_hz, top_cut_hz = 45, 15880
    bend, bend_hz = .12, 11000

    hz = np.arange(1025) * SR / 2048
    level_db = at_hz(mic, hz)
    level_db = level_db + sum(db * np.exp(-((hz - at) / width_hz) ** 2) for at, width_hz, db in notches)
    cepstrum = irfft(np.log(attenuation_scalar(level_db)))
    cepstrum[1:1024] *= 2
    cepstrum[1025:] = 0
    response = irfft(np.exp(rfft(cepstrum)))
    x = signal.fftconvolve(dry, response[None], axes=1)[:, :N]
    x = signal.sosfilt(signal.butter(2, low_cut_hz, "high", fs=SR, output="sos"), x)
    bend_band = signal.butter(4, bend_hz, "high", fs=SR, output="sos")
    x = x + bend * signal.sosfilt(bend_band, np.clip(x, -1, 1) ** 2)
    x = signal.sosfilt(signal.cheby2(14, 30, top_cut_hz, fs=SR, output="sos"), x)
    return roll_off(x)


dry = scene()
out = record(dry)
store_wav(out)
```